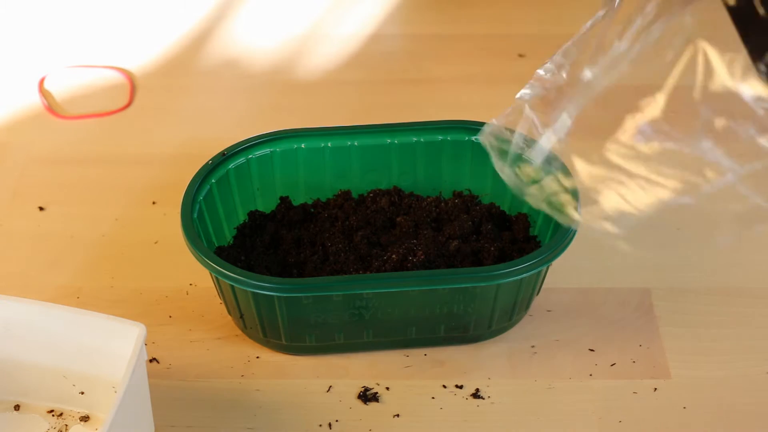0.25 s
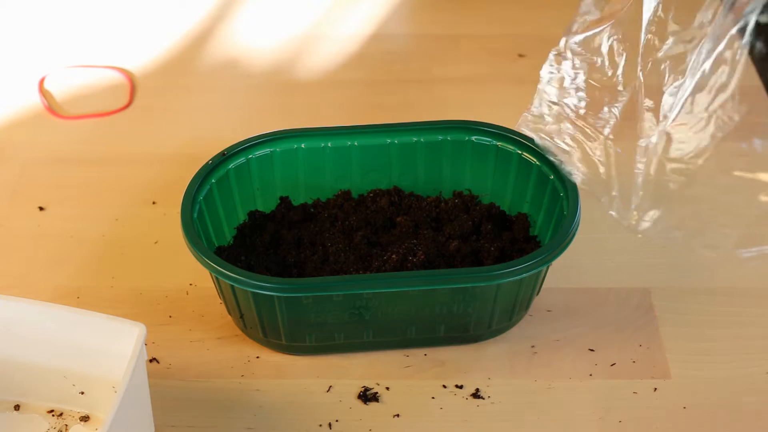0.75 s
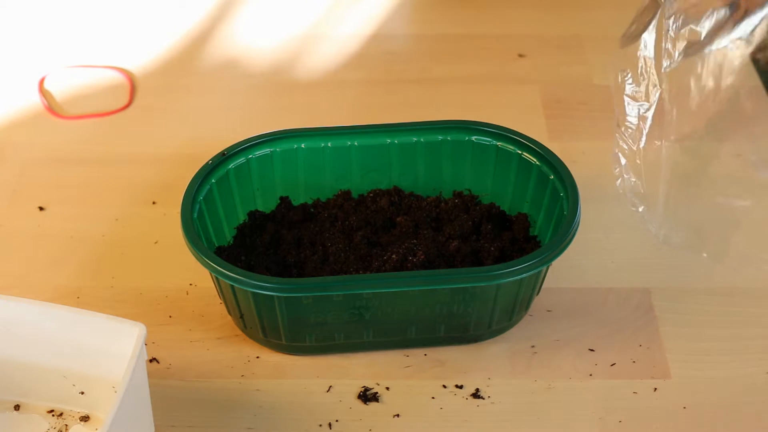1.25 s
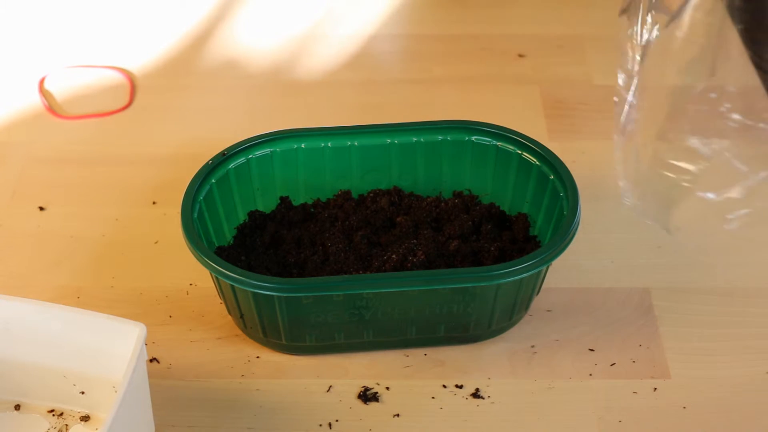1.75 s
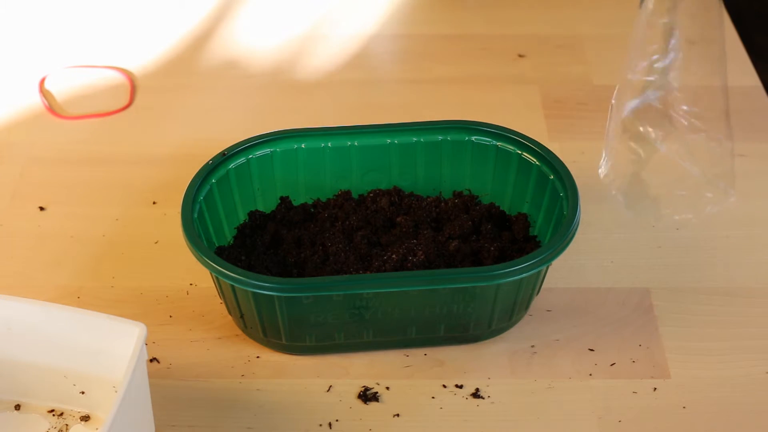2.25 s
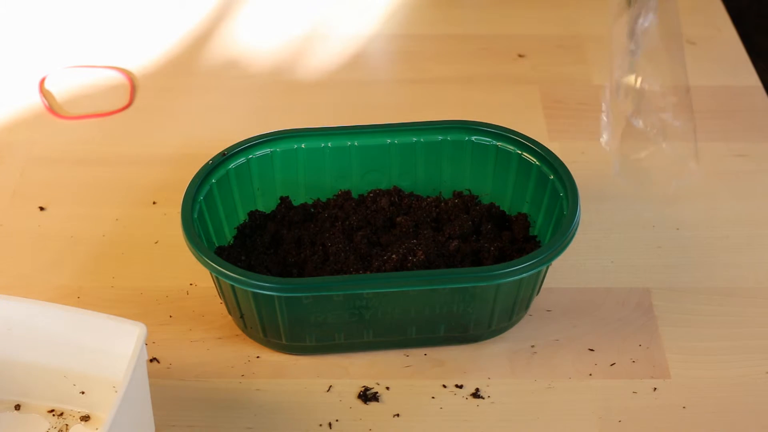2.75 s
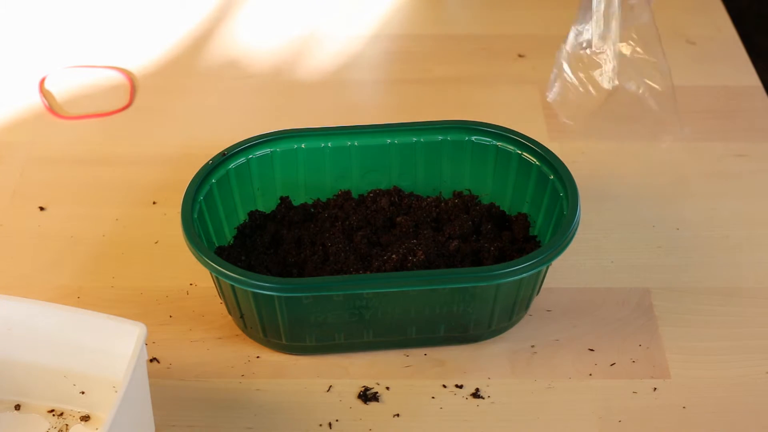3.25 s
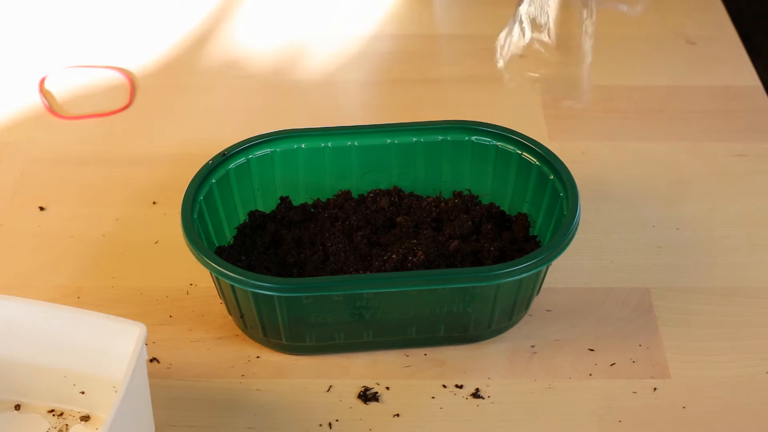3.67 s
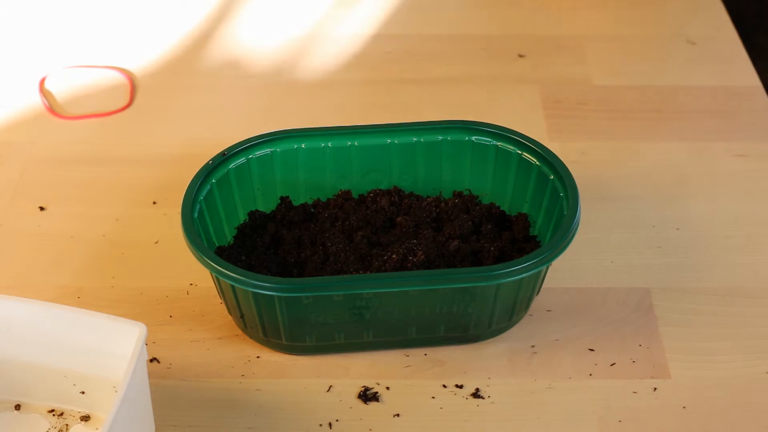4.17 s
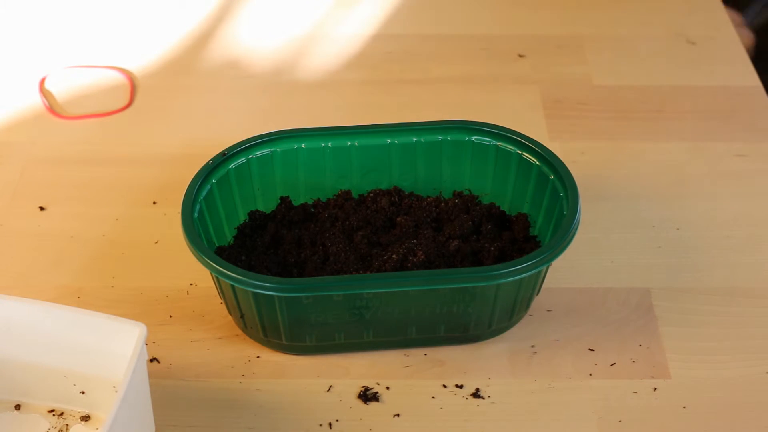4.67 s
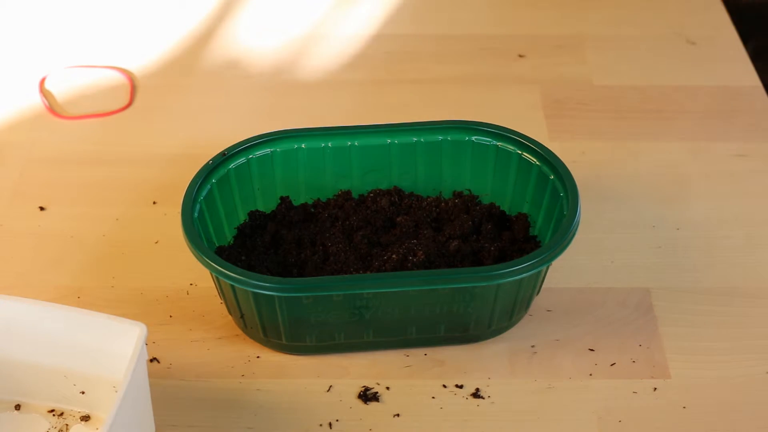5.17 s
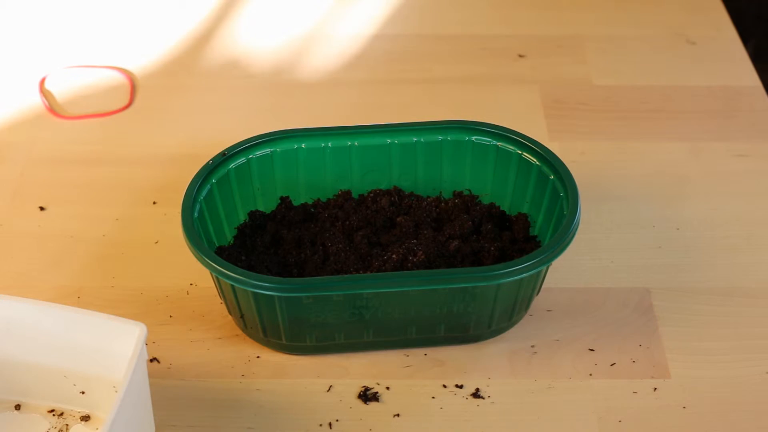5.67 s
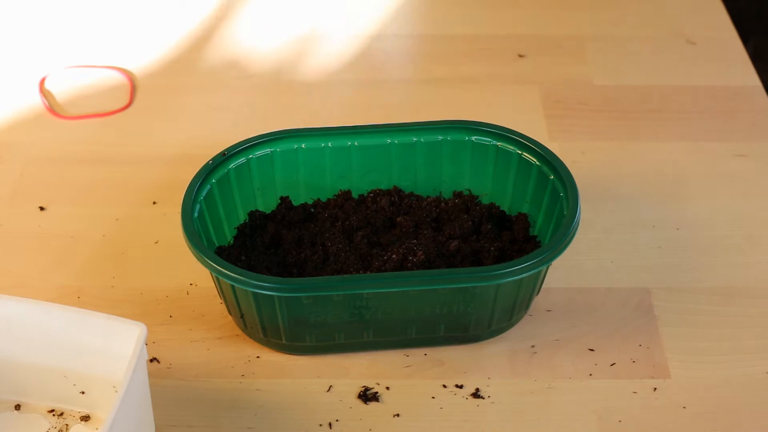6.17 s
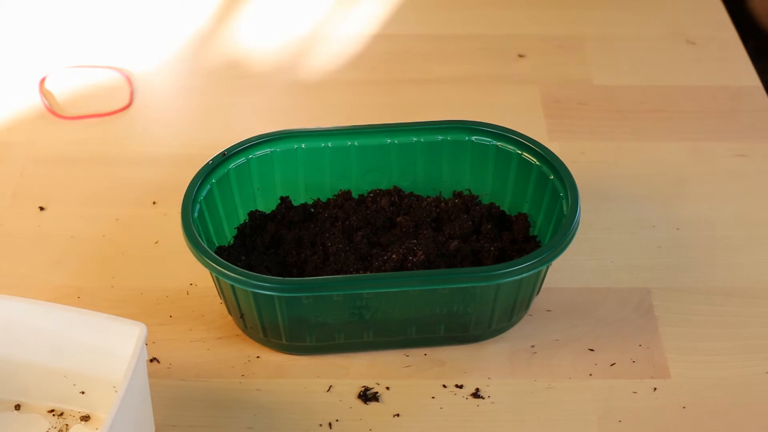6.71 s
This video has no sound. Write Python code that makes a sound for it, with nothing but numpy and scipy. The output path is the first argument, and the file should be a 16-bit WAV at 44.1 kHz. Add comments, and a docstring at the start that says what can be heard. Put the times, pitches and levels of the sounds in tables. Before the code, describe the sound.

Thin plastic film crinkles and snaps in irregular bursts, growing busier, then stops; soft table thumps follow in a small quiet room.

```python
"""Plastic film is pulled and crumpled by hand: strokes drive a hiss of sliding film and showers of tiny creases,
while large creases snap as clicks with a flutter and more or less body.
A few hollow plops are sine tones that swell fast and sag in pitch; soft thumps push a wooden table
whose modes ring. A small quiet room adds echoes, a short tail and a steady murmur of shaped noise."""
import sys
import numpy as np
from scipy import signal
from scipy.fft import rfft, irfft
from scipy.io import wavfile

SR = 44100
rng = np.random.default_rng(int(sys.argv[2]) if len(sys.argv) > 2 else 0)


def master(y):
    """Save y as 16-bit WAV."""
    cut = np.clip(np.atleast_2d(y).T, -1, 1)
    pcm = np.round(cut * 32767)  # scale
    wavfile.write(sys.argv[1], SR, pcm.astype(np.int16))


N = 306054  # length in samples


def amp(db):
    """Decibels to gain."""
    return 10 ** (np.asarray(db) / 20)


def evened(x):
    """Scales to rms 1."""
    return x / np.sqrt(np.mean(x ** 2) + 1e-20)


def read(points, hz):
    """Reads a table along a log-frequency axis."""
    f, value = np.transpose(points)
    return np.interp(np.log(hz + 1), np.log(f + 1), value)


def add(mix, start_s, sound):
    """Mixes a sound in at start_s, cut off at the end of the mix."""
    part = mix[..., round(start_s * SR):][..., :sound.shape[-1]]
    part += sound[..., :part.shape[-1]]


def colour(x, points, size=2048):
    """Causal minimum-phase filter of unit energy, shaped like the given spectrum."""
    hz = abs(np.fft.fftfreq(size, 1 / SR))
    log_gain = np.log(amp(read(points, hz)))
    # the Hilbert transform of the log gain gives the phase
    spectrum = np.exp(np.conj(signal.hilbert(log_gain)))
    taps = np.fft.ifft(spectrum).real
    return signal.oaconvolve(x, taps[None] / np.linalg.norm(taps), axes=1)[:, :N]


def band(x, hz, kind):
    """Gentle second-order filter."""
    sos = signal.butter(2, np.minimum(hz, SR / 2 - 1), kind, fs=SR, output="sos")
    return signal.sosfilt(sos, x)


# Likeness of diffuse sound at the two microphone ports: freq_hz [Hz], likeness [0-1]
PORT_LIKENESS = [(100, .99), (600, .9), (1500, .7), (3000, .35), (5000, .1), (12000, .05)]


def diffuse(size, likeness=PORT_LIKENESS, envelope=1):
    """Noise from all sides: the two ports share as much of each frequency as the likeness says."""
    a, b = rfft(rng.standard_normal((2, size)) * envelope)
    same = np.clip(read(likeness, np.fft.rfftfreq(size, 1 / SR)), 0, 1)
    other_port = same * a + np.sqrt(1 - same ** 2) * b
    return irfft(np.array([a, other_port]), size)


def from_right(x, side_db, count=1):
    """A source on the right reaches the right port louder and count samples sooner."""
    left = np.pad(x, (count, 0))[:len(x)] * amp(-side_db / 2)
    right = x * amp(side_db / 2)
    return np.array([left, right])


# How long the room rings: freq_hz [Hz], t60_s [s]
REVERB = [(150, 0.66), (600, 0.44), (2500, 0.42), (6000, 0.39), (12000, 0.26)]
# Reflections off nearby surfaces: delay_s [s], level_db [dB, before a source's echo_db]
REFLECTIONS = [(.0075, -9.5), (.0092, -19), (0.0117, -12), (0.0157, -28), (.0245, -44)]


def room(x, wet_db, build_s, echo_db=0):
    """Direct sound, smeared echoes off nearby surfaces, and a tail that dies band by band."""
    hz, t, z = signal.stft(diffuse(SR), SR, nperseg=256)
    z = z * amp(-60 * t / read(REVERB, hz)[:, None])
    tail = signal.istft(z * (1 - np.exp(-t / build_s)), SR, nperseg=256)[1]
    tail *= amp(wet_db) / np.linalg.norm(tail[0])
    for delay_s, level_db in REFLECTIONS:
        smear = diffuse(size=128, envelope=np.exp(-np.arange(128) / SR / .0007))
        add(tail, delay_s, amp(level_db + echo_db) * smear / np.linalg.norm(smear[0]))
    return x + signal.fftconvolve(x, tail, axes=1)[:, :N]


# Spectrum of the room's still air: freq_hz [Hz], density_db [dB per Hz, relative]
AIR_SPECTRUM = [(15, -41), (25, -4), (75, -6.5), (150, -7), (234, -6), (296, -9), (328, -7), (472, 0),
                (566, -9.5), (679, -10), (928, -11), (1110, -12), (1200, -15), (2560, -13.5),
                (12500, -24.5), (16200, -75), (22000, -120)]
# Likeness of the murmur at the two ports: freq_hz [Hz], likeness [0-1]
MURMUR_LIKENESS = [(40, 0.56), (90, 1), (200, 0.29), (480, 0.76), (1000, 0.22), (3000, 0), (12000, 0)]


def air(level_db=-56):
    """Steady low murmur of the room with a little hiss, made of shaped noise."""
    noise = rfft(diffuse(N, MURMUR_LIKENESS))
    shaped = noise * amp(read(AIR_SPECTRUM, np.fft.rfftfreq(N, 1 / SR)))
    return amp(level_db) * evened(irfft(shaped, N))


# Modes of the table and what stands on it: mode_hz [Hz], mode_db [dB, relative], t60_s [s]
TABLE_MODES = [(60.5, -13.5, 0.4), (85.6, -19, 0.14), (108.6, -10.5, 0.19), (136, -5.5, 0.11),
               (177.5, -9.5, 0.085), (247, -8, 0.15), (296.2, -17.5, 0.16), (334, -14.5, 0.13),
               (379, 0, 0.034), (419, -3, 0.079), (450, -4.5, 0.062), (550, 1.5, 0.033), (612, -4.5, 0.057),
               (661, -3.5, 0.07), (742, -5.5, 0.055), (921, -8, 0.075), (985, -4.5, 0.086),
               (1185, -22, 0.096), (1350, -7, 0.055)]
# Taps and blows on the table:
# start_s [s], level_db [dB, relative], contact_s [s], weight_db [dB, added to the bass modes]
TABLE_BLOWS = [(0.79, -50, 0.00042, -12), (3.601, -42.5, 0.00052, -16), (3.662, -47.5, 0.0004, -15),
               (4.204, -41.5, 0.0026, -11), (4.887, -24.5, 0.0019, 1.5), (4.906, -36, 0.0031, 5),
               (4.9662, -26.5, .0015, -1), (4.988, -35, 0.0027, 5), (5.053, -52, 0.00065, 18),
               (5.067, -41, 0.0064, 6), (6.251, -14.5, 0.00089, -5.5), (6.261, -25.5, 0.0016, 2),
               (6.466, -43.5, 0.0012, 0), (6.614, -42, 0.0011, -5), (6.630, -46.5, 0.00072, 7),
               (6.665, -42.5, 0.0031, 6.5)]


def thumps(bass_hz=150, dense_db=9, dense_s=0.037, dense_hz=300, tick_db=-10, tick_s=0.0059, tick_hz=2000):
    """Each blow is a half-sine push on the table: the longer the contact, the duller the thump."""
    out, t = np.zeros(N), np.arange(SR // 2) / SR
    for start_s, level_db, contact_s, weight_db in TABLE_BLOWS:
        a, b = rng.standard_normal((2, len(t)))
        # between the strong modes lie many weak ones, too close to tell apart
        ring = amp(dense_db) * band(a, dense_hz, "high") * np.exp(-t / dense_s)
        for k, (mode_hz, mode_db, t60_s) in enumerate(TABLE_MODES):
            size = amp(mode_db + weight_db * (mode_hz < bass_hz))
            decay = np.exp(-np.log(1000) * t / t60_s)
            # neighbouring modes start in opposite polarity
            ring += (-1) ** k * size * np.cos(2 * np.pi * mode_hz * t) * decay
        push = np.sin(np.pi * t[t < contact_s] / contact_s)
        add(out, start_s, amp(level_db) * signal.fftconvolve(ring, push / push.sum()))
        # the first touch makes a small tick
        tick = signal.lfilter(*signal.butter(1, tick_hz, fs=SR), b) * np.exp(-t / tick_s)
        add(out, start_s, amp(level_db + tick_db) * tick)
    return from_right(band(out, 40, "high"), side_db=.7, count=3)


# Hollow plops: start_s [s], level_db [dB, relative], pitch_hz [Hz, midway through the sag],
# swell_s [s], tick_db [dB, relative to the tone]
HOLLOW_PLOPS = [(1.7127, -24.5, 780, 0.0021, -5.5), (1.719, -32, 1050, 0.0013, -25),
                (1.7282, -29, 670, 0.0016, -17), (1.73, -37, 407, 0.0082, -28),
                (1.7626, -21, 592, 0.0024, -5.5), (1.769, -38, 1030, 0.0029, -20),
                (1.7725, -34, 670, 0.0034, -27)]


def plops(sag=0.11, sag_s=0.0052, tick_s=0.0034, size=3000):
    """Short hollow tones that swell fast and sag in pitch, each begun by a dull tick."""
    out, t = np.zeros(N), np.arange(size) / SR
    for start_s, level_db, pitch_hz, swell_s, tick_db in HOLLOW_PLOPS:
        # sag is the whole pitch drop, as a share of pitch_hz
        turns = np.cumsum(pitch_hz * (1 + sag * (np.exp(-t / sag_s) - .5))) / SR
        swell = (t / swell_s * np.exp(1 - t / swell_s)) ** 2
        tone = np.sin(2 * np.pi * turns) * swell
        dull = band(band(rng.standard_normal(size), [400, 2600], "band"), 1600, "low")
        tick = evened(dull) * np.exp(-t / tick_s)
        add(out, start_s, amp(level_db) * (tone + amp(tick_db) * tick))
    return from_right(out, side_db=3, count=11)


# Strokes of the hand that pull or crumple the film:
# full_pull_s [s], level_db [dB, relative], rise_s [s], hold_s [s]
HAND_STROKES = [(0.134, -51.5, 0.0074, 0.041), (0.422, -56.5, 0.033, 0.16), (0.588, -47.5, 0.032, 0.024),
                (0.666, -51.5, .02, 0.11), (0.779, -50.5, .01, 0.094), (0.901, -49, .015, 0.081),
                (1.087, -46, 0.051, 0.0097), (1.16, -43, 0.017, 0.01), (1.22, -52.5, 0.017, .03),
                (1.371, -46.5, 0.029, 0.01), (1.455, -37.5, 0.039, .008), (1.909, -40.5, 0.033, 0.016),
                (2.036, -54.5, 0.021, 0.057), (2.24, -34.5, 0.019, 0.036), (2.473, -46, 0.039, 0.034),
                (2.599, -36.5, 0.017, 0.069), (2.834, -38.5, 0.028, 0.072), (2.953, -34, 0.019, 0.058),
                (3.123, -48, 0.018, 0.043), (3.205, -31, 0.01, .015), (3.278, -32.5, 0.011, 0.06),
                (3.467, -49, 0.026, 0.098), (3.586, -37.5, 0.026, 0.0057), (3.635, -36, 0.046, 0.01),
                (3.954, -54.5, 0.017, 0.039), (4.104, -53.5, 0.074, 0.2), (4.351, -52.5, 0.017, 0.11),
                (5.71, -61.5, 0.032, 0.25), (5.966, -43.5, 0.018, 0.0058), (6.13, -57.5, 0.072, 0.19),
                (6.472, -61.5, 0.025, 0.22)]
SAG_DB_PER_S = 19  # the film slackens while a pull is held
RELEASE_S = 0.029  # and falls quiet this fast when the hand lets go
SETTLE_DB = -65  # left alone, it keeps settling faintly


def handling():
    """How hard the film is worked: each stroke builds up, sags while held, and is let go."""
    t, power = np.arange(N) / SR, np.full(N, amp(SETTLE_DB) ** 2)
    for full_pull_s, level_db, rise_s, hold_s in HAND_STROKES:
        early = np.maximum(full_pull_s - t, 0)
        held = np.clip(t - full_pull_s, 0, hold_s)
        late = np.maximum(t - full_pull_s - hold_s, 0)
        stroke = amp(level_db - SAG_DB_PER_S * held) * np.exp(-early / rise_s - late / RELEASE_S)
        power += stroke ** 2
    return np.sqrt(power)


def crease(flutter_s, crack_db, size=400):
    """A crease starts to give, cracks a millisecond later, and the film around it flutters."""
    t, crack_s = np.arange(size) / SR, .001
    flutter = diffuse(size) * np.exp(-abs(t - crack_s) / flutter_s)
    flutter /= np.linalg.norm(flutter[0])
    crack = rng.choice([-1, 1]) * signal.unit_impulse(size, round(crack_s * SR))
    both = flutter + amp(crack_db) * from_right(crack, side_db=3.5)
    return both / np.hypot(1, amp(crack_db))


# Colour of the taut film: freq_hz [Hz], density_db [dB per Hz, relative]
TAUT_COLOUR = [(60, -31), (130, -19.5), (300, -17), (520, -3), (750, -4.5), (1000, 1.5), (1450, -2.5),
               (2200, 3), (3000, 1.5), (4200, -1.5), (6000, -0.5), (8200, -1), (11300, -6), (12400, -13)]
# Colour of the slack film: freq_hz [Hz], density_db [dB per Hz, relative]
SLACK_COLOUR = [(120, -27), (300, 4.5), (600, 1), (1200, 1.5), (2200, 4), (3500, 3), (5500, 1.5), (8500, 2),
                (12000, -2.5)]


def rustle(per_s=600, crackle_db=-1, slide_db=-7, taut_db=-42, range_db=4, count=32):
    """Showers of tiny creases over the hiss of film on film; hard pulls give the fuller, taut colour."""
    effort = handling()
    effort_db = 20 * np.log10(effort)
    shapes = np.array([crease(flutter_s=.0009, crack_db=-3) for _ in range(count)])
    # most creases are faint, a few stand out
    sizes = amp(4.5 * np.minimum(rng.exponential(1, N), 3))
    crackle = np.zeros((2, N))
    for at in np.flatnonzero(rng.random(N) < per_s / SR):
        add(crackle, at / SR, sizes[at] * shapes[at % count])
    slide = evened(diffuse(N))
    film = effort * (amp(crackle_db) * evened(crackle) + amp(slide_db) * slide)
    # share of taut film: half at taut_db, changing over a few range_db
    taut = .5 + .5 * np.tanh((effort_db - taut_db) / range_db / 2)
    return colour(film * taut, TAUT_COLOUR) + colour(film * (1 - taut), SLACK_COLOUR)


# The loudest single creases flipping:
# start_s [s], strength_db [dB, relative], body_db [dB, gain below 3 kHz]
CREASE_SNAPS = [(0.4893, -22, -11), (0.6447, -17, -5), (0.6535, -15, -9), (0.6713, -16, -10),
                (0.6808, -13, -5), (0.7888, -20, 4), (1.0659, -18, -2), (1.1570, -16, -6), (1.4763, -9, -1),
                (1.5032, -13, -3), (1.8953, -9, -5), (2.2347, -3, -4), (2.242, -7, 0), (2.3133, -10, 0),
                (2.4644, -15, 0), (2.5153, -8, -1), (2.5543, -8, -3), (2.5882, -9, -6), (2.6368, -2, -17),
                (2.6601, -5, -9), (2.8118, -10, -4), (2.8303, -1, -2), (2.8696, 0, -3), (2.941, -5, 3),
                (2.9542, -5, 1), (2.9957, -3, -2), (3.1878, 0, 0), (3.197, -3, 0), (3.2617, 1, -3),
                (3.2800, 1, 0), (3.5541, -11, -3), (3.6004, -2, 0), (3.6626, -5, -3)]


def snaps():
    """The large creases; the wider the patch that flips, the more body it has."""
    out = np.zeros((2, N))
    for start_s, strength_db, body_db in CREASE_SNAPS:
        click = crease(flutter_s=.0012, crack_db=-4)
        low = signal.filtfilt(*signal.butter(2, 3000, fs=SR), click)
        add(out, start_s, amp(strength_db) * (click - low + amp(body_db) * low))
    return colour(out, TAUT_COLOUR)


def wander(x, wet_db, build_s, places=5, step_s=.03):
    """The moving film meets the room's echoes from a cycle of places, crossfaded at each step."""
    place = np.arange(N) / SR / step_s
    out = np.zeros((2, N))
    for k in range(places):
        away = np.minimum(abs((place - k + places / 2) % places - places / 2), 1)
        out += room(x * np.cos(np.pi / 2 * away) ** 2, wet_db, build_s)
    return out


def scene():
    """The film to the right of the microphone, the table below it, the room around."""
    table = room(thumps(), wet_db=-13.5, build_s=0.0076, echo_db=-11)
    hollow = room(plops(), wet_db=-25.0, build_s=.01, echo_db=-5)
    # the film reaches both ports in the same polarity, the right one slightly louder
    film = wander(snaps() + rustle(), wet_db=-2.5, build_s=0.001) * amp(0) * np.array([[-.7], [.7]])
    film = film * amp([[-.7], [.7]]) / np.array([[-.7], [.7]])
    return air() + table + hollow + film


def record(dry):
    """Removes everything above 12.3 kHz with a steep low-pass."""
    taps = signal.firwin(401, 12300, window=("kaiser", 8), fs=SR)
    return signal.oaconvolve(dry, taps[None], "same")


dry = scene()
out = record(dry)
master(out)
```